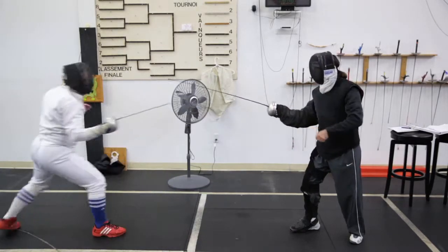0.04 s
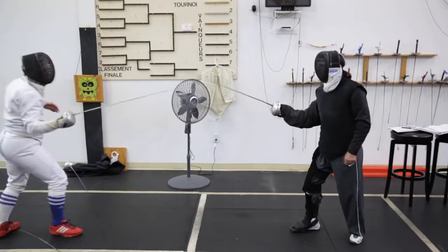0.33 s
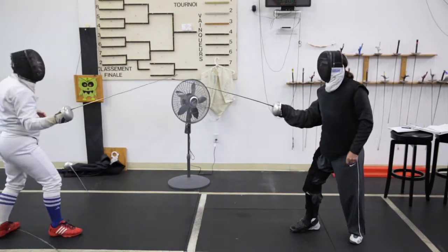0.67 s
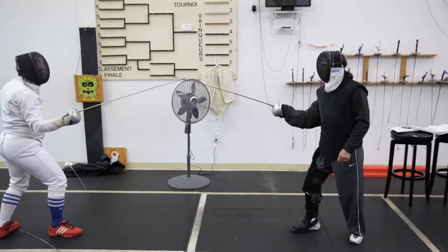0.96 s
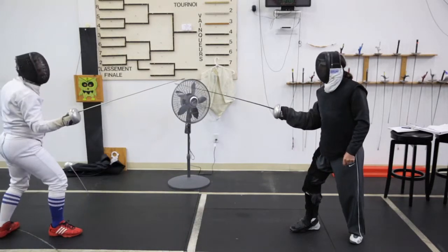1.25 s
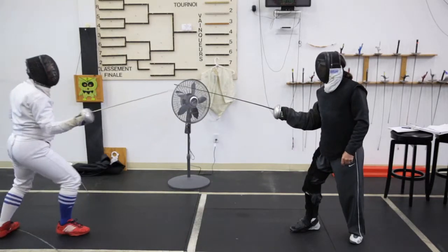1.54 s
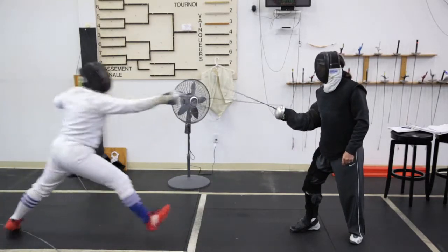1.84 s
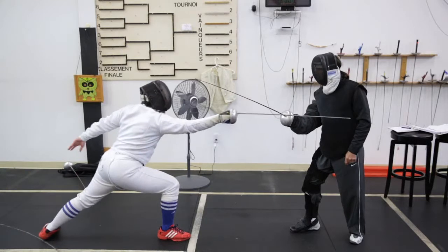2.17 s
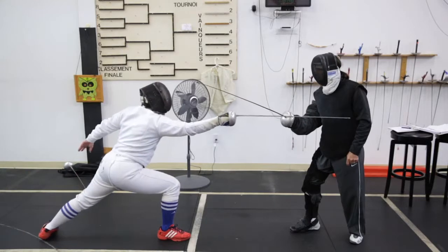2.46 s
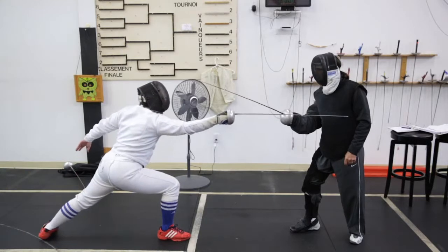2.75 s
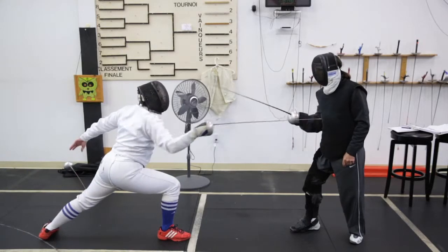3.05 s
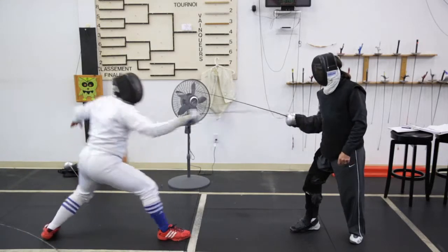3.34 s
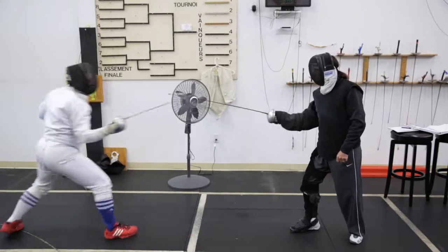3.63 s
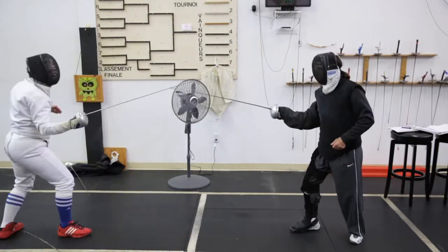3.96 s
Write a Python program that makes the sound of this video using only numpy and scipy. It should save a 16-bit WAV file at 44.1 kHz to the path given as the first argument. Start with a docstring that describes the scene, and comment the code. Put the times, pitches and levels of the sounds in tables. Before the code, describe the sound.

One ringing sword hit with a dull knock rattles briefly as a fencer lunges in a reverberant sports hall. Light shoe taps come before it, and louder recovery footfalls and rustling clothes follow, over a faint rumble and hiss.

```python
"""Fencing lunge in a sports hall

A fencer steps back, lunges and recovers on a sprung floor, clothes and soles swishing.
The blade strikes with a clang and a dull knock, then chatters as the front foot lands.
Shoes knock on the mat, the boards under it thud, and the hall rings on over a faint rumble and hiss."""
import sys
import numpy as np
from scipy import signal
from scipy.fft import rfft, irfft
from scipy.io import wavfile

SR = 44100
rng = np.random.default_rng(int(sys.argv[2]) if len(sys.argv) > 2 else 0)


def unload_wav(signal):
    """Save mono or channel-first audio to the path in sys.argv[1] as 16-bit WAV at rate SR, clipped to [-1, 1]."""
    wavfile.write(
        sys.argv[1],
        SR,
        np.round(np.clip(np.atleast_2d(signal).T, -1, 1) * 32767).astype(np.int16),
    )


N = 4 * SR


def amp(db):
    """Decibels to gain."""
    return 10 ** (np.asarray(db) / 20)


def curve_at(points, hz):
    """Reads a curve on a log-frequency axis."""
    point_hz, values = np.transpose(points)
    return np.interp(np.log(hz + 1), np.log(point_hz + 1), values)


def colour(x, spectrum):
    """Shapes x with an EQ curve and brings it to an rms of one."""
    gain = amp(curve_at(spectrum, np.fft.rfftfreq(len(x), 1 / SR)))
    shaped = irfft(rfft(x) * gain, len(x))
    return shaped / np.sqrt(np.mean(shaped ** 2) + 1e-20)


def add(mix, start_s, sound):
    """Mixes a sound in at its start time."""
    part = mix[round(start_s * SR):][:len(sound)]
    part += sound[:len(part)]


def attack(t, rise_s):
    """An onset that eases up to full level."""
    return 1 - np.exp(-t / rise_s)


def decay(t, t60):
    """Falls by 60 dB every t60 seconds."""
    return np.exp(-np.log(1000) * t / t60)


def burst(t, spectrum, t60):
    """A short dying puff of coloured noise."""
    return colour(rng.standard_normal(len(t)), spectrum) * decay(t, t60)


def ring(t, modes):
    """Dying partials, each starting at a random point of its swing."""
    return sum(amp(db) * decay(t, t60) * np.sin(2 * np.pi * (hz * t + rng.random()))
               for hz, db, t60 in modes)


# EQ of the room tone. Each row: frequency in Hz, gain in dB.
ROOM_EQ = [(12, -33), (20, -6), (59, 3.5), (129, -2), (232, 0), (315, -15), (439, -13), (549, -13),
           (906, -25.5), (1410, -24), (1540, -22), (1770, -21), (5090, -23), (12100, -23.5), (15500, -23)]


def room_tone():
    """The air of the hall: a faint, steady rumble and hiss."""
    return amp(-56) * colour(rng.standard_normal(N), ROOM_EQ)


# Fader ride for the low flapping of cloth. Each row: time in seconds, level in dB.
FLAP_LEVELS = [(0, -54.5), (.45, -57), (.7, -58.5), (1.0, -61.5), (1.2, -55.5), (1.45, -64.5), (1.75, -61),
               (1.95, -49), (2.15, -51), (2.4, -69), (2.75, -72), (2.9, -49), (3.15, -46.5), (3.4, -53.5),
               (3.65, -56), (4, -55)]
# Fader rides for the swishes. Each row: time in seconds, body level in dB, upper band level in dB.
SWISH_LEVELS = [(0, -46.5, -51.5), (.04, -44.5, -48.5), (.2, -48, -54.5), (.30, -49.5, -55),
                (.35, -56.5, -65), (.44, -44.5, -49), (.51, -56.5, -67.5), (.56, -58, -63), (.66, -59, -74),
                (.78, -62.5, -69), (.98, -66.5, -76.5), (1.17, -58.5, -68.5), (1.4, -72, -75),
                (1.7, -68.5, -78), (1.86, -56.5, -63.5), (1.92, -52, -64), (2.06, -42.5, -48.5),
                (2.25, -60.5, -57.5), (2.5, -79, -73), (2.761, -61, -68), (2.83, -47, -56), (2.9, -43, -52),
                (3.0, -44, -48), (3.14, -42.5, -49.5), (3.21, -55, -58.5), (3.29, -40, -50),
                (3.36, -60, -71), (3.39, -47.5, -59), (3.44, -41.5, -62), (3.52, -49.5, -62),
                (3.61, -47.5, -58), (3.8, -58.5, -64), (4, -58, -63.5)]
# EQs of the three bands, dull to bright. Each row: frequency in Hz, gain in dB.
FLAP_EQ = [(30, -21), (100, 0), (220, -2.5), (350, -2.5), (600, -22), (1500, -49), (4000, -68)]
BODY_EQ = [(30, -35), (150, -14.5), (280, -2), (400, 0.5), (550, 1.5), (750, -4), (1000, -13.5),
           (1600, -31.5), (4000, -43)]
UPPER_EQ = [(200, -37), (600, -16), (900, 2), (1150, 1.5), (1500, -2.5), (2000, -11), (3000, -18.5),
            (4500, -30), (9000, -64)]


def swishes():
    """Dense tiny slips of cloth and rubber, in three bands that share a slight flutter."""
    out, t = np.zeros(N), np.arange(N) / SR
    slips_per_s, flutter_rms_db = 2500, 0.5
    flutter_eq = [(5, 20), (40, 0), (150, -70), (600, -100)]
    flutter_db = flutter_rms_db * colour(rng.standard_normal(N), flutter_eq)
    flap_s, flap_db = np.transpose(FLAP_LEVELS)
    swish_s, body_db, upper_db = np.transpose(SWISH_LEVELS)
    bands = [(FLAP_EQ, flap_s, flap_db), (BODY_EQ, swish_s, body_db), (UPPER_EQ, swish_s, upper_db)]
    for eq, times, levels_db in bands:
        noise = rng.standard_normal(N)
        unevenness_db = -1.5 * np.minimum(rng.exponential(1, N), 4)
        slipping = rng.random(N) < slips_per_s / SR
        rustle = colour(noise * amp(unevenness_db) * slipping, eq)
        out += rustle * amp(np.interp(t, times, levels_db) + flutter_db)
    return out


# Footfalls on the mat. Each row: start in seconds, knock peak in dB, pitch in Hz,
# cycles to die by 60 dB, slap level in dB.
FOOTFALLS = [(0.609, -36.5, 446, 3.9, -54), (.634, -34, 407, 2.5, -45), (.688, -42, 380, 3, -53),
             (.932, -49, 332, 2.2, -68), (1.195, -53, 330, 3, -60), (1.277, -48, 295, 3, -67),
             (2.117, -26, 313, 5.5, -42), (2.1222, -29.5, 510, 4.9, -35), (2.7433, -26.5, 217, 2.15, -46),
             (3.1189, -20, 494, 1.3, -32), (3.1218, -13, 343, 2.1, -37), (3.1368, -16.5, 417, 2.05, -36),
             (3.1405, -21, 250, 2.4, -34), (3.1439, -21, 396, 2.5, -44), (3.1475, -29, 400, 2.3, -30),
             (3.153, -22, 280, 1.4, -48), (3.162, -22.5, 336, 1, -37), (3.2707, -23.5, 430, 1.9, -48),
             (3.2759, -22, 440, 5.5, -36.5), (3.2951, -24.5, 385, 2.1, -55),
             (3.2969, -19.5, 316, 1.64, -38.5), (3.433, -31.5, 470, 6.9, -54), (3.574, -32, 524, 8.4, -44),
             (3.8365, -26, 410, 0.66, -51), (3.942, -42.5, 328, 2.5, -57), (3.958, -33, 390, 1.23, -58)]
# EQ of a sole slapping the mat. Each row: frequency in Hz, gain in dB.
SLAP_EQ = [(60, -19), (300, -19), (700, 9), (1300, -0.5), (2200, -11), (4000, -23), (9000, -52)]


def shoes():
    """Each shoe hits the mat with a heavily damped knock and a little slap of the sole."""
    out, t = np.zeros(N), np.arange(SR // 10) / SR
    rise_cycles = 0.51
    for start_s, knock_db, hz, cycles, slap_db in FOOTFALLS:
        soft_onset = 1 - np.exp(-(t * hz / rise_cycles) ** 2)
        knock = np.sin(2 * np.pi * hz * t) * decay(t, cycles / hz) * soft_onset
        slap = burst(t, SLAP_EQ, t60=0.019) * attack(t, rise_s=0.0002)
        add(out, start_s, amp(knock_db) * knock / abs(knock).max() + amp(slap_db) * slap)
    return out


# The blade's strike and chatter. Each row: start in seconds, clang gain in dB, bright edge gain in dB,
# centre of the clang in Hz, its spread either side in octaves.
BLADE_HITS = [(1.933, -29, -42, 800, 1.9), (1.9385, -30.5, -47.5, 810, 1.3), (1.9452, -40, -59, 800, 2),
              (1.952, -34.5, -70, 1300, 0.48), (1.960, -41.5, -65, 1330, .3),
              (1.978, -40, -45.5, 1500, 0.41), (2.0082, -28.5, -45, 820, 0.35),
              (2.025, -56, -45, 1100, 0.63), (2.044, -51, -49, 850, 0.57), (2.057, -34.5, -46, 1020, 0.22),
              (2.099, -38, -50.5, 1120, 0.24), (2.131, -48, -46.5, 1100, 0.36),
              (2.169, -43, -47, 1080, 0.36), (2.177, -38, -52, 1090, 0.11), (2.219, -57, -52, 1080, .3),
              (2.686, -73, -57, 1100, .5)]
# The midrange ring of guard and blade, then the high ring of the steel.
# Each row: pitch in Hz, relative level in dB, seconds to die by 60 dB.
GUARD_MODES = [(612, -7, 0.13), (668, -4, 0.11), (752, -3, 0.14), (844, -0.5, 0.087), (889, -7, 0.24),
               (1033, -10.5, 0.27), (1060, -9.5, .35), (1157, -13.5, 0.36), (1178, -6, 0.2),
               (1304, -5, 0.23), (1365, -3, 0.075), (1391, -4, 0.13), (1533, -11.5, 0.13)]
STEEL_MODES = [(2454, -15, .1), (3376, -17, 0.54), (4333, -6, 0.083), (4830, -16, .35), (4900, -9, .1),
               (4985, -7.5, 0.15), (5200, -7, 0.075), (5350, -15, 0.16), (6420, -13, .12)]
# EQs of a hit's hard clack and thin scrape. Each row: frequency in Hz, gain in dB.
CLACK_EQ = [(40, -29), (150, -2), (320, -16), (480, -15), (800, 7), (1250, 3.5), (1550, -7), (2100, -19.5),
            (3500, -42), (9000, -60)]
SCRAPE_EQ = [(800, -19), (2200, -5), (3800, -0.5), (5100, 1.5), (6500, -3), (8500, -7.5), (12000, -21),
             (16000, -21)]


def blade():
    """Each hit clacks, rings the guard most strongly around its own centre pitch and scrapes the steel."""
    out, t = np.zeros(N), np.arange(SR) / SR
    for start_s, clang_db, edge_db, centre_hz, spread_octaves in BLADE_HITS:
        struck_modes = []
        for hz, db, t60 in GUARD_MODES:
            off_centre = np.log2(hz / centre_hz) / spread_octaves
            struck_modes.append((hz, db - 10 * np.log10(1 + off_centre ** 4), t60))
        clang = amp(-4) * ring(t, struck_modes) + amp(-2) * burst(t, CLACK_EQ, t60=0.08)
        edge = amp(-9.5) * ring(t, STEEL_MODES) + amp(-7) * burst(t, SCRAPE_EQ, t60=0.11)
        hit = amp(clang_db) * clang + amp(edge_db) * edge
        add(out, start_s, hit * attack(t, rise_s=0.00059))
    return out


# The dull body of the thrust. Each row: pitch in Hz, relative level in dB, seconds to die by 60 dB.
THRUST_MODES = [(160, -8.5, 0.05), (238, -2, 0.11), (320, 3, 0.11)]


def thrust():
    """The thrust lands with a short, low, hollow knock."""
    out, t = np.zeros(N), np.arange(SR // 2) / SR
    knock = amp(-32.5) * ring(t, THRUST_MODES) * attack(t, rise_s=0.0012)
    add(out, start_s=1.9345, sound=knock)
    return out


# Thuds under the mat. Each row: start in seconds, level in dB, pitch in Hz, seconds to die by 60 dB.
FLOOR_THUDS = [(2.124, -27.5, 74, .11), (2.749, -30.5, 68, .13), (3.123, -21.5, 138, 0.11),
               (3.149, -26.5, 54, 0.2), (3.151, -23, 140, .08), (3.183, -29, 100, 0.05),
               (3.188, -22.5, 40.7, 0.13), (3.299, -18, 62, 0.093), (3.2906, -27.5, 44.4, .1),
               (3.325, -30, 100, .05), (3.353, -32, 38, 0.17), (3.845, -40, 34.6, 0.41),
               (3.846, -40, 112, 0.085)]


def boards():
    """The sprung floor swings for a few slow cycles under the fencer's weight."""
    out, t = np.zeros(N), np.arange(SR // 2) / SR
    for start_s, db, hz, t60 in FLOOR_THUDS:
        envelope = attack(t, rise_s=0.0012) * decay(t, t60)
        add(out, start_s, amp(db) * envelope * np.sin(2 * np.pi * hz * t))
    return out


# Length of the reverb. Each row: frequency in Hz, seconds to die by 60 dB.
HALL_DECAY = [(60, 1.3), (300, 1.3), (700, 1.31), (1100, 1.34), (1800, 1.33), (5000, 1), (12000, 0.32)]
# EQ of the reverb. Each row: frequency in Hz, gain in dB.
HALL_EQ = [(60, -4.5), (300, -5), (600, -12), (850, -2.5), (1100, 4), (1400, -1.5), (2000, 4.5),
           (5000, -7.5), (12000, -3)]


def hall(send):
    """Reflections merge into a diffuse tail that builds quickly and loses its treble first."""
    hz, t, noise_bands = signal.stft(rng.standard_normal(SR + SR // 2), SR, nperseg=512)
    dying_bands = noise_bands * decay(t, curve_at(HALL_DECAY, hz)[:, None]) * attack(t, rise_s=0.015)
    plain_tail = signal.istft(dying_bands, SR)[1]
    coloured_tail = signal.istft(dying_bands * amp(curve_at(HALL_EQ, hz))[:, None], SR)[1]
    return signal.fftconvolve(send, coloured_tail / np.linalg.norm(plain_tail))[:N]


def scene():
    """The mono mix: plenty of reverb on the blade, a little on the feet, the rest dry."""
    steel = blade()
    feet = shoes() + boards()
    reverb = hall(amp(-6) * steel + amp(-18) * feet)
    return (room_tone() + steel + thrust() + feet + swishes() + reverb)[None]


def record(dry):
    """A steep low-pass takes the very top off the mix."""
    cutoff_hz = 15800
    lowpass = signal.firwin(1023, cutoff_hz, window=("kaiser", 9), fs=SR)
    return signal.oaconvolve(dry, lowpass[None], "same")


dry = scene()
out = record(dry)
unload_wav(out)
```